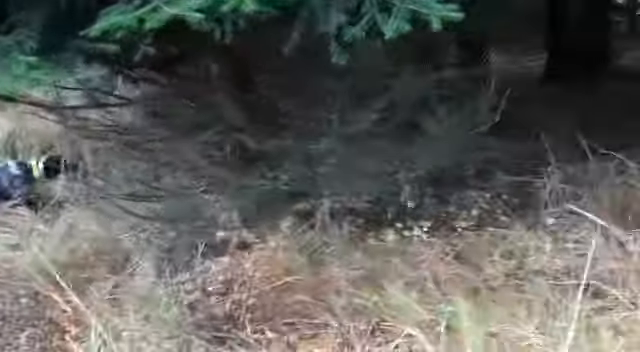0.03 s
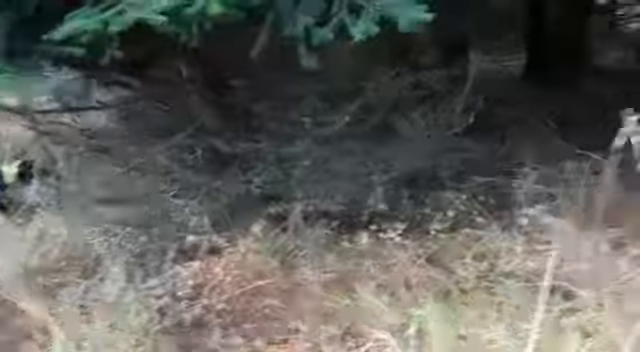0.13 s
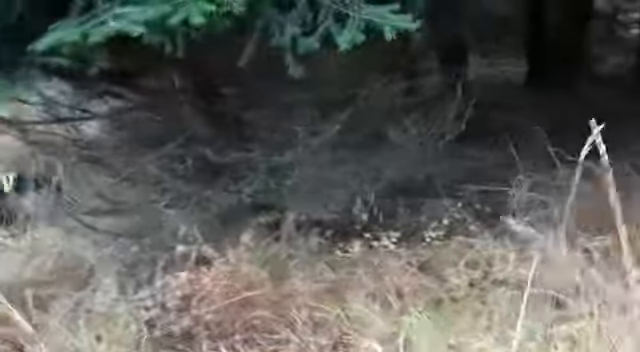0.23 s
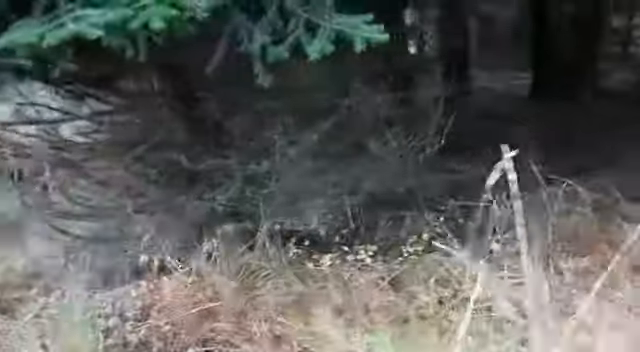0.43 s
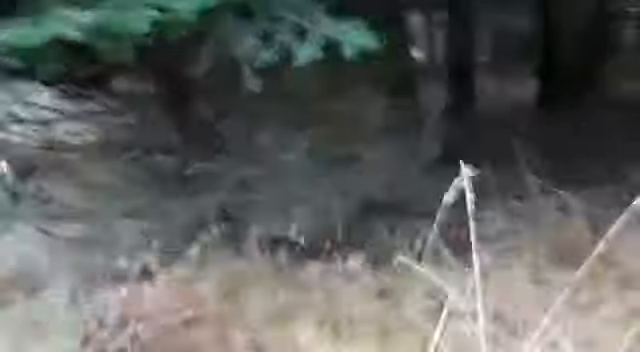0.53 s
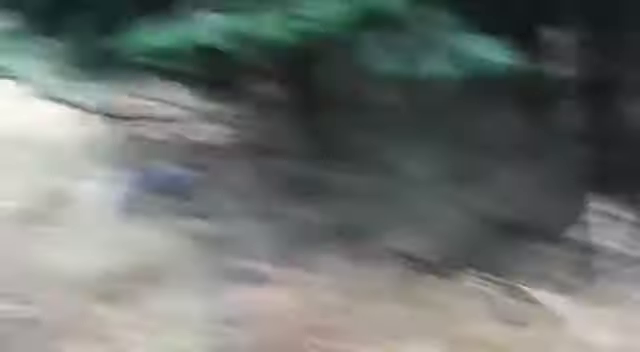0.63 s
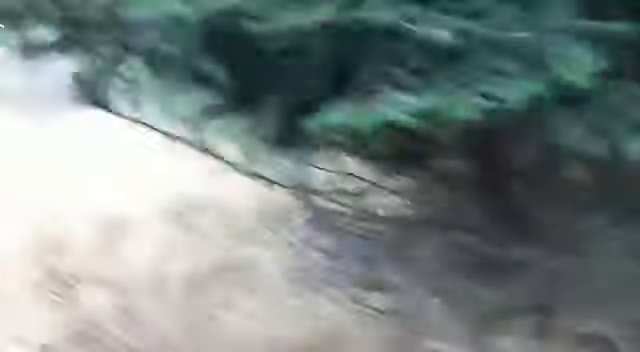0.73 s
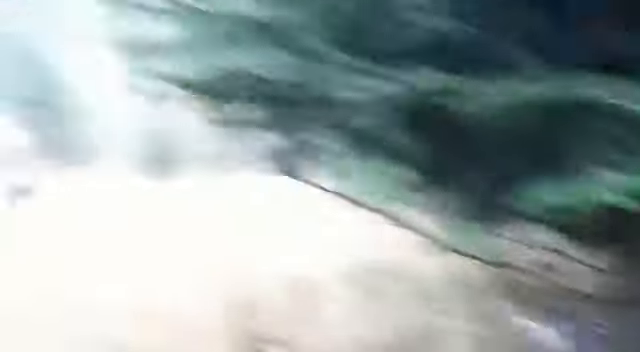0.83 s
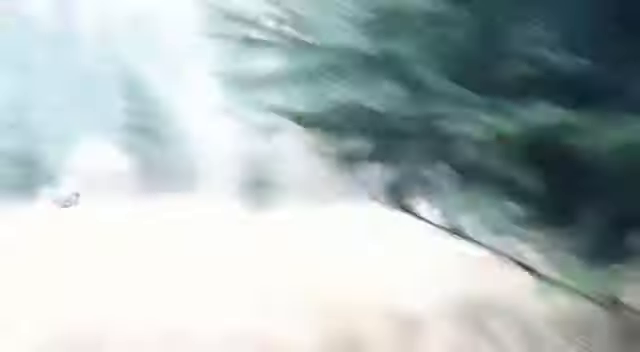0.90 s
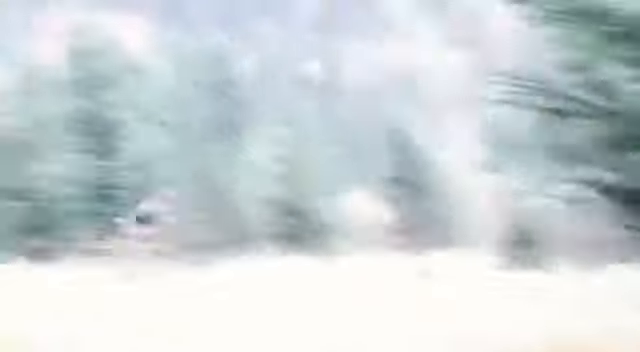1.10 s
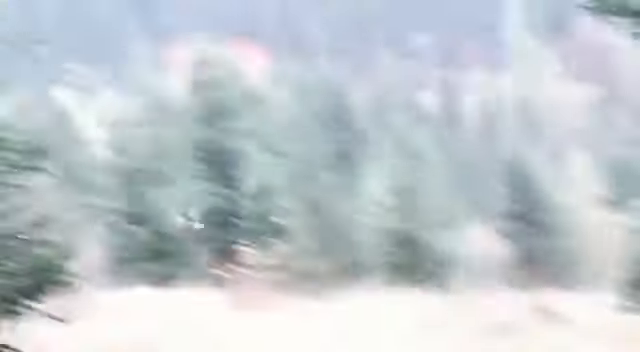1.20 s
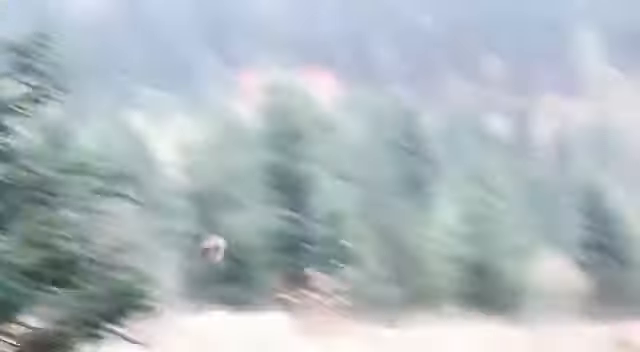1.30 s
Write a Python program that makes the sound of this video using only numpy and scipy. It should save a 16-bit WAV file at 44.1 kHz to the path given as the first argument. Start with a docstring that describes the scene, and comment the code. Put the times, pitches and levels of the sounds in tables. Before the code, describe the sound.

A small metal bell on a dog's collar rattles in short bursts close to the microphone. Before it, dry grass rustles, twigs snap and paws knock softly as the dog pushes along the edge of a wood.

```python
"""Dry grass rustles and twigs snap as a dog pushes along the edge of a wood, paws knocking on the ground.
Then it passes close to the microphone, and the small metal bell on its collar rattles in short bursts:
each contact of the clapper clacks, chokes the ring of the shell and starts a new one.
The sound swings from one side of the stereo pair to the other with the dog's bearing."""
import sys
import numpy as np
from scipy import signal
from scipy.fft import rfft, irfft
from scipy.io import wavfile
from scipy.ndimage import map_coordinates

SR = 44100
rng = np.random.default_rng(int(sys.argv[2]) if len(sys.argv) > 2 else 0)


def master_out(mix):
    """Clip the mix to full scale and print it as 16-bit PCM to the path in sys.argv[1]."""
    frames = np.transpose(np.atleast_2d(mix))
    ceiling = np.clip(frames, -1, 1)
    pcm = np.round(ceiling * 32767).astype(np.int16)
    wavfile.write(sys.argv[1], SR, pcm)


N = 59535
TIME = np.arange(N) / SR
FREQS = np.maximum(np.fft.rfftfreq(N, 1 / SR), 1)


def from_db(db):
    """Decibels to gain."""
    return 10 ** (np.asarray(db) / 20)


def rms_one(x):
    """Scale to unit level."""
    return x / np.sqrt(np.mean(x ** 2) + 1e-20)


def in_time(rows):
    """A control curve at every sample."""
    return np.interp(TIME, *np.transpose(rows))


def per_bin(points):
    """A curve over log frequency at every bin."""
    hz, value = np.transpose(points)
    return np.interp(np.log(FREQS), np.log(hz), value)


def pan(db):
    """Left and right gains for a level difference, left minus right."""
    return from_db(np.array([[db], [-db]]) / 2)


def decay(start, t60):
    """An envelope that jumps to one and dies away."""
    return (TIME >= start) * np.exp(-np.log(1000) * np.maximum(TIME - start, 0) / t60)


def rise(start, length):
    """A smooth step from zero to one."""
    return np.sin(np.pi / 2 * np.clip((TIME - start) / length, 0, 1)) ** 2


def mode(start, hz, t60):
    """One dying sine."""
    return decay(start, t60) * np.sin(2 * np.pi * hz * (TIME - start))


def drift(rate_hz):
    """A smooth random wander of unit spread."""
    return rms_one(irfft(rfft(rng.standard_normal(N)) / (1 + (FREQS / rate_hz) ** 4), N))


def coloured(spectrum_db, source=None):
    """Shape white noise, or a two-row source, into unit-level stereo: narrow bass, wide treble."""
    # likeness of the microphone's two sides: (frequency [Hz], correlation [0-1])
    likeness = [(60, 0.89), (500, 0.99), (1500, 0.75), (4000, 0.24), (12000, 0)]
    alike = per_bin(likeness)
    mid, side = rfft(rng.standard_normal((2, N)) if source is None else source)
    stereo = np.sqrt(1 + alike) * mid + np.sqrt(1 - alike) * side * [[1], [-1]]
    return rms_one(irfft(from_db(spectrum_db) * stereo, N))


def cracks(rows):
    """Dry cracks: each a very short burst and a brief ring at its own pitch, with little far above it."""
    width_octaves, top_octaves = 0.86, 0.81
    total = 0
    for start, db, hz, t60 in rows:
        spectrum_db = -20 * np.log10(1 + (np.log2(FREQS / hz) / width_octaves) ** 2)
        burst = decay(start, t60) * coloured(spectrum_db)
        ring = from_db(2.5) * mode(start, hz, t60=0.0053)
        crack = rise(start, 0.0003) * (burst + ring)
        lowpass = signal.butter(4, min(hz * 2 ** top_octaves, 15850), fs=SR, output="sos")
        total += from_db(db) * signal.sosfilt(lowpass, crack + 1e-18)
    return pan(-1.5) * total


def undergrowth():
    """Around the dog, trodden ground thuds, leaves brush and grass hisses."""
    # the course of each sound: (time [s], relative level [dB])
    thud_level = [(0, -63), (.035, -59), (.08, -59.5), (.22, -72), (.275, -45.5), (.305, -53), (.335, -44),
                  (.4, -55), (.45, -47), (.5, -55.5), (.545, -50.5), (.6, -57), (.75, -62.5), (1.05, -64),
                  (1.085, -69), (1.15, -63), (1.3, -63), (1.35, -68)]
    brush_level = [(0, -65.5), (.03, -59), (.08, -60), (.21, -70), (.27, -50), (.3, -60.5), (.345, -44),
                   (.4, -54), (.44, -42), (.47, -53), (.54, -50.5), (.6, -54), (.66, -49.5), (.72, -58),
                   (.8, -58), (.9, -66.5), (1.1, -70), (1.2, -91), (1.35, -63.5)]
    hiss_level = [(0, -51), (.1, -50.5), (.2, -57.5), (.27, -60), (.33, -54), (.4, -57.5), (.55, -50),
                  (.61, -45), (.7, -49.5), (.85, -56), (1.1, -58), (1.27, -65.5), (1.35, -50)]
    # their spectra: (frequency [Hz], relative level [dB])
    thud_spectrum = [(20, -44), (35, -32), (50, -13), (80, -4.5), (170, -2), (240, -6.5), (350, -20.5),
                     (700, -19.5)]
    brush_spectrum = [(180, -56), (330, -4.5), (500, 2), (800, 0), (1200, 0.5), (1800, -5.5), (3500, -18.5)]
    hiss_spectrum = [(3000, -21), (6000, -10), (9500, -12), (12500, -2.5), (15000, -6.5), (16500, -6.5)]
    thud = from_db(in_time(thud_level) + 2.5) * coloured(per_bin(thud_spectrum))
    brush = from_db(in_time(brush_level) + 2) * coloured(per_bin(brush_spectrum))
    hiss = from_db(in_time(hiss_level) + 2) * coloured(per_bin(hiss_spectrum))
    return thud + brush + hiss


def dry_stems():
    """Dry stems crackle in clumps of tiny clicks over a smooth rustle of the same colour."""
    # the course of the crackle: (time [s], relative level [dB])
    crackle_level = [(0, -49), (.1, -46.5), (.16, -53), (.22, -51), (.255, -42.5), (.28, -35), (.31, -49),
                     (.325, -35), (.37, -37), (.41, -44), (.44, -34.5), (.47, -44), (.65, -42.5), (.8, -44),
                     (1.1, -43.5), (1.26, -57), (1.35, -50.5)]
    # its spectrum: (frequency [Hz], relative level [dB])
    crackle_spectrum = [(700, -11.5), (1500, -9), (2500, 2.5), (4200, 4), (6000, -1.5), (8000, -33),
                        (11000, -7), (16000, -6.5)]
    clicks_per_s, spread_db, clump_db = 900, 1.5, 3.5
    sizes = from_db(spread_db * np.minimum(rng.exponential(1, (2, N)), 4))
    signs = rng.choice([-1, 1], (2, N))
    clumps = from_db(clump_db * drift(rate_hz=110))
    clicks = sizes * signs * clumps * (rng.random((2, N)) < clicks_per_s / SR)
    grain = from_db(-6.5) * coloured(per_bin(crackle_spectrum), clicks)
    rustle = from_db(-7.5) * coloured(per_bin(crackle_spectrum))
    return from_db(in_time(crackle_level)) * (grain + rustle) * pan(-2)


def paws():
    """Paws land on ground and wood with soft, quickly damped knocks."""
    # footfalls: (time [s], level [dB], frequency [Hz], t60 [s])
    knocks = [(0.03, -27.5, 237, 0.015), (0.329, -42, 175.8, 0.25), (.433, -30, 626, 0.031),
              (.481, -21.5, 540, 0.022), (0.534, -24, 158, 0.012), (.556, -30, 650, 0.055),
              (0.899, -53, 72.5, 0.11), (1.07, -51.5, 81.6, 0.13), (1.328, -49, 88.5, 0.081)]
    return sum(from_db(db) * rise(start, 0.0028) * mode(start, hz, t60) for start, db, hz, t60 in knocks)


def twigs():
    """Twigs snap as the dog pushes through."""
    # snaps: (time [s], relative level [dB], centre [Hz], burst t60 [s])
    snaps = [(.187, -39.5, 840, 0.011), (0.2343, -23.5, 3980, 0.0031), (.2343, -33.5, 1580, 0.011),
             (.2343, -29, 10970, 0.0069), (.2491, -24, 1510, 0.0061), (0.273, -38, 4550, 0.0087),
             (0.2853, -26, 4550, 0.0066), (0.3178, -31, 1960, 0.014), (0.3235, -20.5, 4630, 0.0082),
             (0.3387, -27, 4260, .01), (0.3527, -26, 2300, 0.0067), (0.379, -31, 4700, 0.03),
             (0.4282, -25, 2630, 0.0061), (0.4372, -26, 4300, 0.0051), (0.4438, -24, 4380, 0.0024),
             (0.4875, -30.5, 12500, 0.0044), (0.507, -32, 3820, 0.0096), (0.508, -32.5, 11340, 0.0038),
             (0.5362, -27, 3160, 0.013), (.5362, -28, 830, .012), (0.622, -36, 4100, 0.0054),
             (0.655, -34, 3750, 0.013), (0.736, -37, 1100, 0.0095), (1.3465, -39.5, 3800, 0.051)]
    return cracks(snaps)


def clapper_ticks():
    """The clapper glances off the shell with a dry tick."""
    # glancing blows: (time [s], relative level [dB], centre [Hz], burst t60 [s])
    ticks = [(.862, -30, 4000, 0.0052), (.9195, -26, 4370, 0.0066), (1.0437, -29, 4360, 0.0058),
             (1.0805, -35, 5200, .006), (1.0812, -39, 2940, 0.0078), (1.128, -28, 4140, 0.012),
             (1.128, -25, 13200, 0.01), (1.1528, -54, 4600, 0.0051)]
    return cracks(ticks)


def clapper_pings():
    """Metal on metal sets off a bright, short-lived ring within the rattle."""
    # bright strikes: (time [s], level [dB])
    pings = [(.862, -39), (.9035, -25.5), (.9195, -45), (.9915, -33.5), (1.0445, -33), (1.051, -40),
             (1.128, -35.5)]
    # their modes: (frequency [Hz], relative level [dB], t60 [s], left minus right [dB])
    modes = [(3753, 0, .08, -6), (3860, -8, .05, -6), (7200, -16, .06, 0), (10470, -10, .08, 0)]
    return sum(pan(pan_db) * from_db(level_db + db) * rise(start, 0.00043) * mode(start, hz, t60)
               for start, level_db in pings for hz, db, t60, pan_db in modes)


def collar_bell():
    """Close by, each clapper contact clacks and resets how strongly the shell's four registers ring."""
    # clapper contacts, levels relative:
    # (time [s], low ring [dB], middle ring [dB], high ring [dB], shimmer [dB], clack [dB])
    contacts = [(0.391, -39, -66, -52, -75, -60), (0.457, -31, -70, -52, -68, -61),
                (.478, -44, -50, -49.5, -74, -65), (0.578, -38, -63, -57, -67, -64),
                (0.591, -29, -58, -52, -48, -63), (0.611, -44, -45, -44.5, -70, -53),
                (0.7766, -28, -38, -43.5, -47.5, -53), (0.801, -42.5, -38.5, -44, -58, -70),
                (0.823, -48.5, -42, -49, -60, -70), (0.863, -40, -40, -42.5, -44, -45),
                (0.8869, -25.5, -31, -27, -37.5, -34), (0.897, -29.5, -63, -41, -37, -37),
                (0.91, -20.5, -41, -28, -36, -27), (0.92, -22, -30, -45, -34.5, -35),
                (0.935, -39, -33, -39.5, -40, -46), (0.95, -48, -31, -40, -53, -62),
                (0.981, -48, -39, -37.5, -51, -36), (0.9907, -34.5, -46.5, -38, -52, -55),
                (1.029, -22.5, -31, -50, -47.5, -47), (1.043, -23, -47, -34.5, -54, -27),
                (1.05, -24, -25, -56, -42, -34), (1.056, -21.5, -41, -32.5, -42, -30.5),
                (1.066, -34.5, -52, -37, -44.5, -46), (1.0783, -28, -54, -43, -52, -34),
                (1.104, -40, -47.5, -51, -47, -65), (1.128, -19.5, -27.5, -20.5, -29, -28),
                (1.1509, -23.5, -34.5, -35, -35, -29.5)]
    # the shell's modes: (frequency [Hz], level in the register [dB], t60 [s], left minus right [dB])
    low_modes = [(1160, -25, .25, -1), (1254, -3, .21, -1.5), (1274, -5, .19, -1), (1305, -19, .3, -1),
                 (1345, -20, .14, -1)]
    middle_modes = [(2820, -11, .48, -4), (3308, 0, .25, -6.5)]
    high_modes = [(5560, -10, .4, -4), (5666, 0, .2, -4)]
    shimmer_modes = [(8717, -8, .22, 1), (8803, -5, .19, 2), (8836, -9, .22, 2), (9050, -15, .15, 0),
                     (10450, -11, .09, 0), (11500, -13, .15, 0), (12087, -8, .22, 2), (12237, -5, .2, -2),
                     (12558, -11, .2, 2), (12845, -10, .2, -2), (13055, -5, .22, 2), (13361, -6, .22, -2),
                     (13650, -11, .12, 0), (13874, -10, .2, 1), (14500, -14, .2, -1), (14910, -9, .2, 1),
                     (15580, -5, .17, 0)]
    # the shell's crowded top modes, and the clapper's clack: (frequency [Hz], relative level [dB])
    sizzle_spectrum = [(7000, -20), (8800, 16), (9800, -36), (11000, 8), (12300, 2), (13300, -15),
                       (14300, -9), (15600, -10), (16200, -36)]
    clack_spectrum = [(800, -28.5), (1400, 8.5), (2100, -22), (3000, -1.5), (3900, 5), (5000, 0),
                      (6400, 1.5), (7500, -29), (9800, -16), (13000, -4), (16000, -8.5)]
    registers = (low_modes, middle_modes, high_modes, shimmer_modes)
    ring_attacks_s, sizzle_attack_s = (0.0049, 0.0026, 0.0065, 0.0011), 0.0021
    # as the bell swings, each mode wavers in level, and in phase the more the higher it lies
    waver_db, waver_rad_per_khz, waver_hz = 1.2, 0.04, 40
    waver = {hz: (waver_db * drift(waver_hz), waver_rad_per_khz * hz / 1000 * drift(waver_hz))
             for modes in registers for hz, *_ in modes}
    ring, sizzle, clack = np.zeros((2, N)), np.zeros(N), np.zeros(N)
    ends = [row[0] for row in contacts[1:]] + [TIME[-1]]
    last_low_db = -np.inf
    for (start, *register_db, clack_db), end in zip(contacts, ends):
        low_db, shimmer_db = register_db[0], register_db[-1]
        if low_db > last_low_db:  # a harder contact starts the beating of the low modes afresh
            beat_start = start
        last_low_db = low_db
        for level_db, attack, modes in zip(register_db, ring_attacks_s, registers):
            gate = rise(start, attack) * (1 - rise(end, attack))  # the next contact chokes the ring
            live = gate > 0
            age = TIME[live] - start
            clock = TIME[live] - (beat_start if modes is low_modes else 0)
            for hz, db, t60, pan_db in modes:
                swell_db, shift = waver[hz]
                envelope = np.exp(-np.log(1000) * age / t60) * gate[live]
                level = from_db(level_db + db + swell_db[live]) * envelope
                ring[:, live] += pan(pan_db) * level * np.sin(2 * np.pi * hz * clock + shift[live])
        sizzle_gate = rise(start, sizzle_attack_s) * (1 - rise(end, sizzle_attack_s))
        sizzle += from_db(shimmer_db - 11) * sizzle_gate * decay(start, t60=0.15)
        clack_tail = from_db(-11) * decay(start, t60=0.06)
        clack += from_db(clack_db - 5.5) * (decay(start, t60=0.04) + clack_tail)
    sizzle_noise = coloured(per_bin(sizzle_spectrum))
    clack_noise = coloured(per_bin(clack_spectrum)) * pan(-4)
    return ring + sizzle * sizzle_noise + clack * clack_noise


def scene():
    """All sounds come from around the dog and reach the microphone's sides at times set by its bearing."""
    # the dog's bearing: (time [s], lag of the left side behind the right [ms])
    bearing = [(0, 0.11), (.25, -0.047), (.42, -0.17), (.6, -0.22), (.7, -0.22), (.79, 0.043),
               (.92, 0.1426), (1.05, 0.22), (1.16, 0.23), (1.35, 0.26)]
    rattle = collar_bell() + clapper_pings() + clapper_ticks()
    left, right = rattle + twigs() + paws() + dry_stems() + undergrowth()
    lag_samples = in_time(bearing) * SR / 1000
    return np.array([
        map_coordinates(side, [np.arange(N) + sign * lag_samples / 2], order=5, mode="nearest")
        for side, sign in ((left, -1), (right, 1))])


def record(dry):
    """The microphone loses the deepest bass, and the top is cut steeply."""
    low_cut_hz, high_cut_hz = 42, 15850
    bass_loss = 1 + (low_cut_hz / FREQS) ** 6
    top_loss = 1 + (FREQS / high_cut_hz) ** 160
    return irfft(rfft(dry) / np.sqrt(bass_loss * top_loss), N)


dry = scene()
out = record(dry)
master_out(out)
```